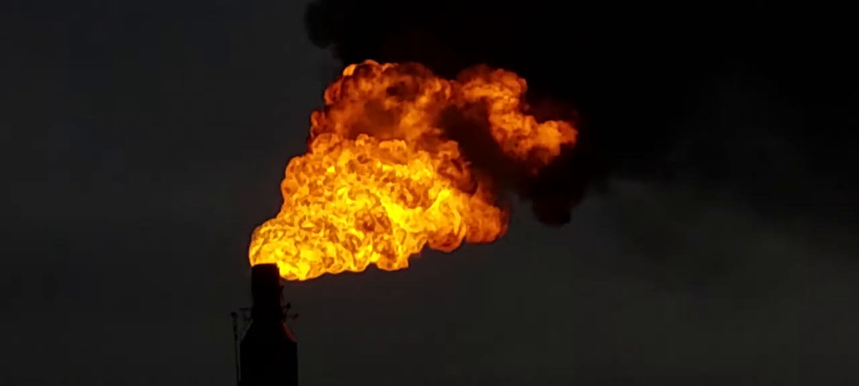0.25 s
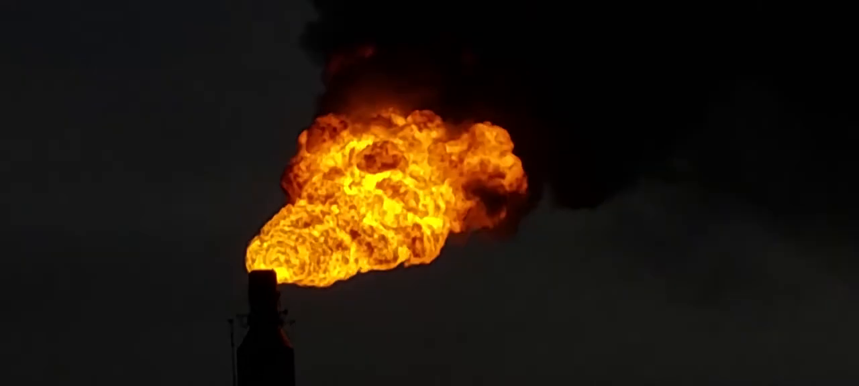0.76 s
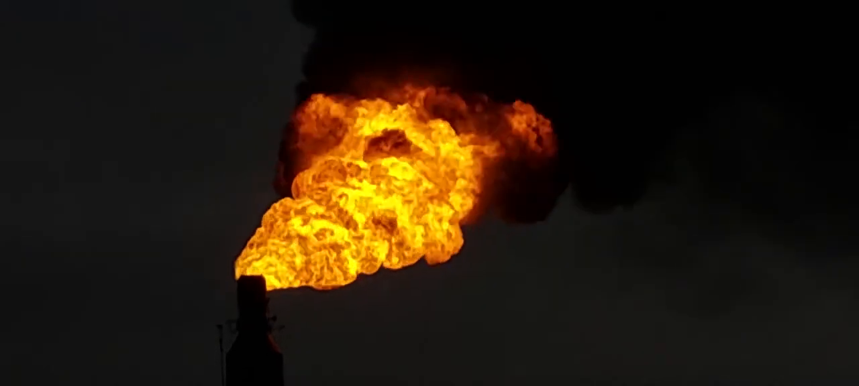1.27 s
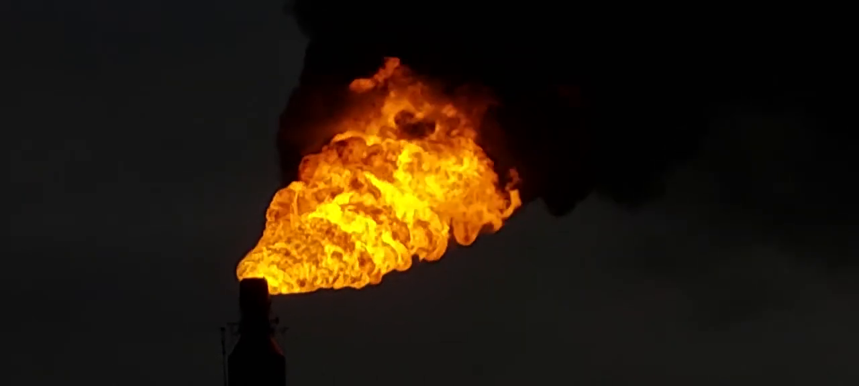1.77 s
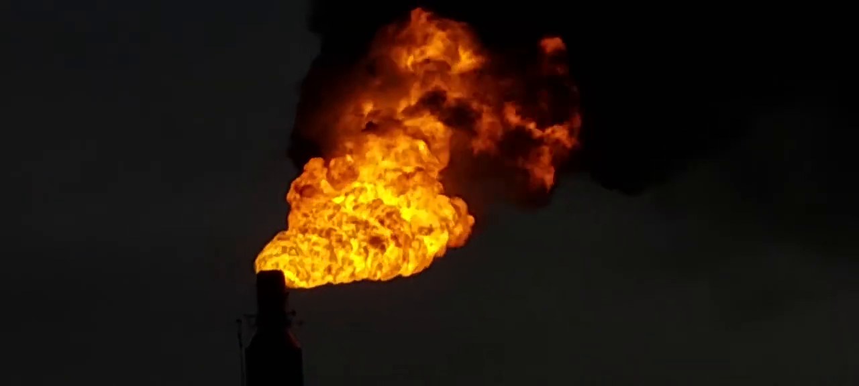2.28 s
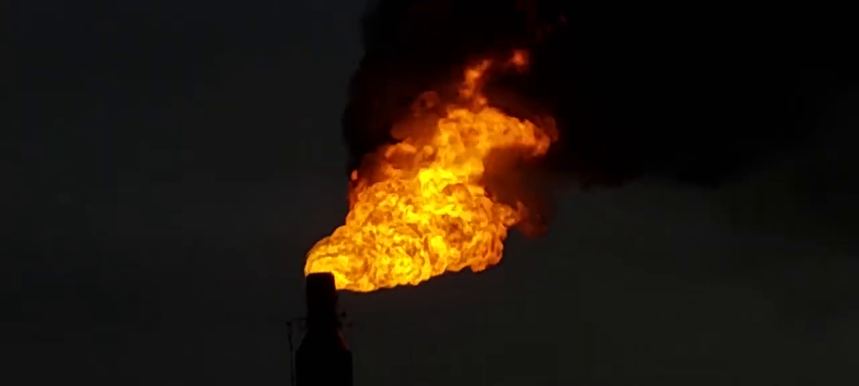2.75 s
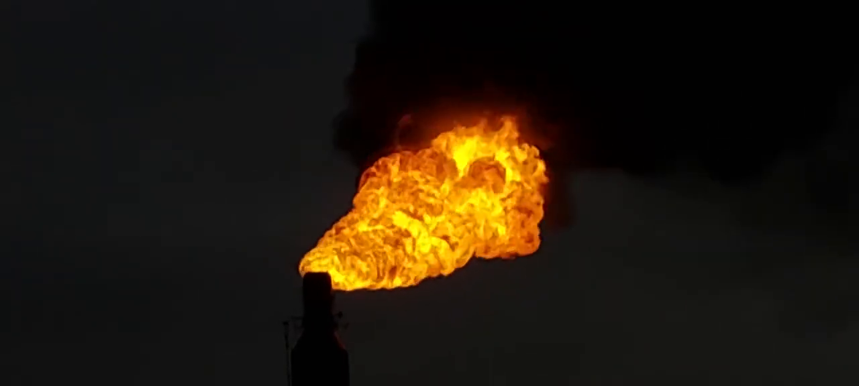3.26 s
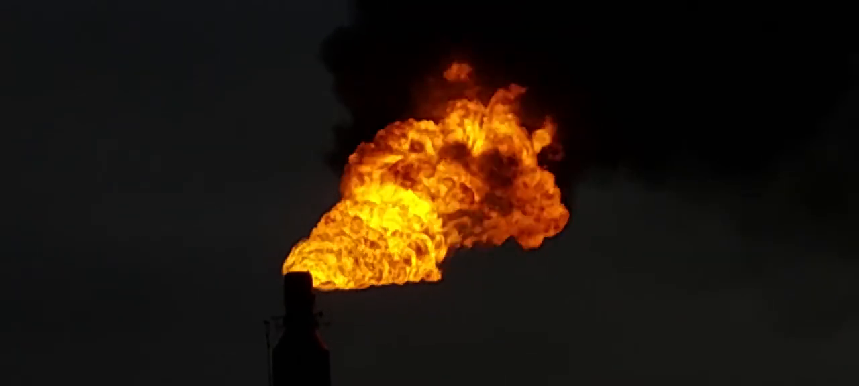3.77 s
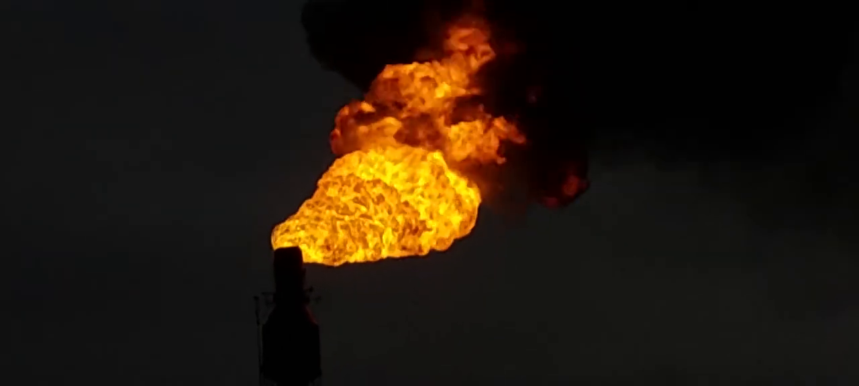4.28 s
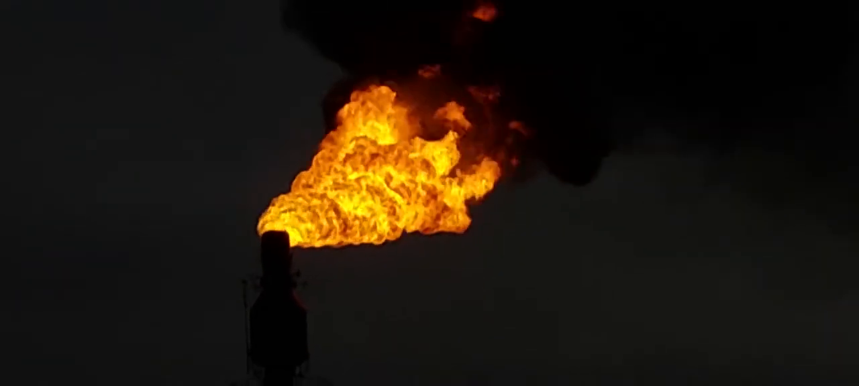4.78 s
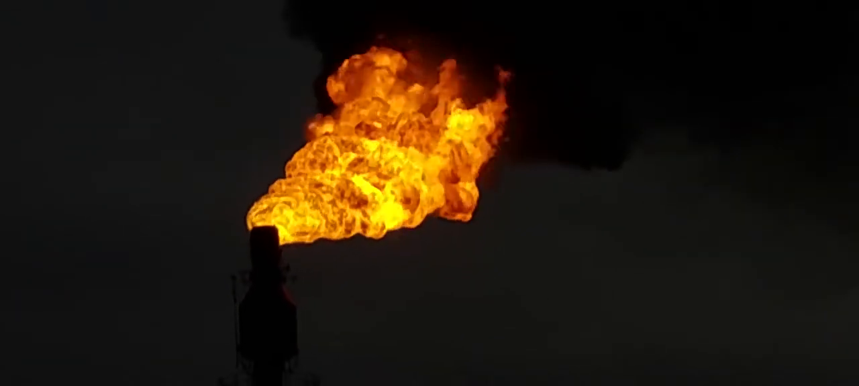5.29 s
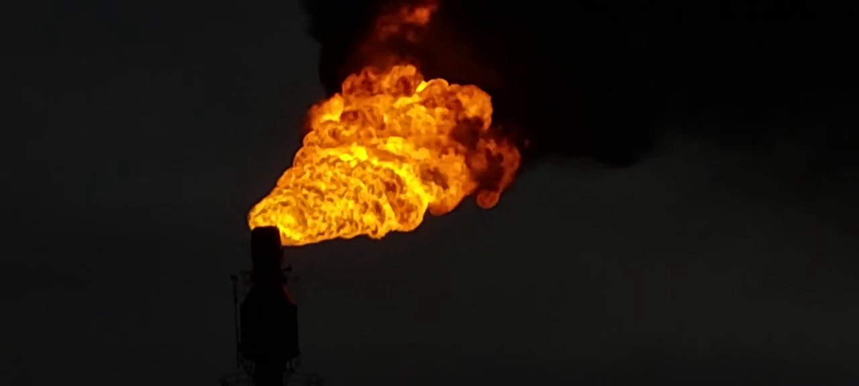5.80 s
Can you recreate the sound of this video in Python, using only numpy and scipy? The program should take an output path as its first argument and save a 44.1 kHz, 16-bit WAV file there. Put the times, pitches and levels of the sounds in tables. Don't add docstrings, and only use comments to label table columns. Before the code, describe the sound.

Steady industrial roar from start to finish: deep rumbling flame, a prominent low generator hum and throbbing hollow steel resonances. Above them lie a muted rush of gas and two faint high whistles, quivering as wind and heat carry them. No distinct events, just small random fluctuations. Open air at sea, captured by a handheld stereo recorder, dull in the extreme treble.

```python
import sys
import numpy as np
from scipy import signal
from scipy.fft import rfft, irfft
from scipy.io import wavfile
from scipy.ndimage import uniform_filter1d

SR = 44100
rng = np.random.default_rng(int(sys.argv[2]) if len(sys.argv) > 2 else 0)


def log_audio(samples):
    frames = np.atleast_2d(samples).T
    limited = np.clip(frames, -1, 1)
    pcm = np.round(limited * 32767).astype(np.int16)
    wavfile.write(sys.argv[1], SR, pcm)


def makeup_ratio(level_db):
    decades = np.asarray(level_db, float) / 20
    return 10 ** decades


N = 266364

# (frequency [Hz], density [dB per Hz])
FLAME_COLOUR = [(18, -80), (30, -73.5), (45, -57), (70, -51), (130, -55), (240, -53), (290, -55.5),
                (350, -58.5), (440, -61), (490, -66), (720, -66.5), (900, -72.5), (1200, -83), (2400, -160)]
# (frequency [Hz], likeness [0-1])
FLAME_ALIKE = [(30, 0.93), (100, 0.99), (150, 0.76), (260, 0.86), (400, 0.27), (520, 0.17), (700, 0)]
BILLOW_HZ, DEEP_BILLOW, UPPER_BILLOW = 1.5, 0.039, 0.09

# (frequency [Hz], density [dB per Hz])
HISS_COLOUR = [(600, -95), (900, -71.5), (1300, -72.5), (1600, -75), (2300, -75), (2900, -82), (3600, -82),
               (4500, -85.5), (5100, -86), (6200, -88.5), (8000, -90.5), (9000, -104), (11500, -103.5),
               (15700, -109)]
# (frequency [Hz], likeness [0-1])
HISS_ALIKENESS = [(800, .5), (1100, 0.5), (1600, 0.66), (2100, 0.78), (2800, 0.3), (3400, 0.24),
                  (4400, 0.35), (5000, 0.062), (5600, 0.71), (6200, .05)]
# (frequency [Hz], left lead [rad])
HISS_LEFT_LEAD = [(700, -3.5), (1100, -2.5), (1500, -1.77), (2000, 0), (2900, 2), (3700, 6.5), (4600, 9),
                  (5300, 11), (6100, 17.5)]

WHINE_PITCH_HZ = [2137.5, 5428.5]
# (time [s], peak level [dB], length [s])
LOW_WHINE_PATHS = [(0.02, -47, 0.04), (0.18, -40.5, 0.09), (0.34, -43, 0.14), (0.42, -40.7, 0.06),
                   (0.61, -43, 0.15), (0.94, -45.5, 0.54), (1.22, -43.5, 0.12), (1.42, -44.5, 0.13),
                   (1.62, -45.5, 0.33), (1.96, -42.5, 0.31), (2.16, -39.5, 0.14), (2.41, -49.5, 0.21),
                   (2.67, -43, 0.08), (2.83, -43.0, 0.08), (3.06, -50.4, 0.47), (3.33, -47, 0.08),
                   (3.56, -43.5, 0.09), (3.72, -43.4, 0.12), (3.87, -45.6, 0.18), (4.04, -49.5, 0.11),
                   (4.17, -44, 0.06), (4.3, -46.5, 0.13), (4.51, -41.2, 0.1), (4.83, -44, 0.47),
                   (5.03, -39.5, 0.12), (5.17, -49.7, 0.06), (5.37, -49.1, 0.09), (5.6, -42.5, 0.07),
                   (5.76, -44.5, 0.16), (5.94, -42.9, 0.15)]
# (time [s], peak level [dB], length [s])
HIGH_WHINE_PATHS = [(0.06, -53.6, 0.06), (0.16, -54.5, 0.07), (0.26, -51.5, 0.05), (0.46, -57, 0.15),
                    (0.53, -50, 0.15), (0.69, -54, 0.32), (0.97, -54.5, 0.13), (1.16, -58.4, 0.1),
                    (1.36, -60.6, 0.08), (1.48, -60.2, 0.05), (1.57, -51, 0.1), (1.67, -55, 0.08),
                    (1.83, -56, 0.12), (2.15, -56.0, 0.51), (2.63, -53, 0.077), (2.74, -61, 0.28),
                    (3.0, -62, 0.15), (3.19, -55.5, 0.11), (3.55, -54, 0.55), (3.89, -52, 0.1),
                    (4.1, -57.3, 0.37), (4.37, -54.5, 0.1), (4.46, -55.5, 0.09), (4.67, -58.4, 0.14),
                    (4.83, -56.5, 0.15), (5.03, -56.5, 0.4), (5.36, -55.4, 0.07), (5.53, -51.5, 0.16),
                    (5.7, -55.5, 0.09), (5.98, -60, 0.09)]
WHINE_LULLS = [-56, -66]

# (time [s], pitch [Hz], level [dB])
FIRING_TONE = [
    (0, 89.87, -19.7),
    (1.5, 89.91, -19.7),
    (3, 89.94, -19.7),
    (3.5, 89.99, -19.7),
    (4.5, 89.93, -19.7),
    (6.04, 89.91, -19.7),
]
# (multiple of firing tone [-], level [dB rms], left-right [dB], left lead [rad])
SHAFT_ORDERS = [(7 / 6, -45, -0.6, -.08), (1.5, -40.5, -5.5, 0.23), (2.0, -41.5, -1, -0.2),
                (5.0, -53, -3, -1.4)]

DECK_DRONE_HZ = [55.04, 74.6, 323.4]
# (time [s], peak level [dB], length [s])
LOW_DRONE_SWELLS = [(0.1, -38.5, 0.64), (0.76, -34, 0.48), (1.16, -35.9, 0.12), (1.36, -33.3, 0.28),
                    (1.93, -34.5, 0.57), (2.38, -36.5, 0.22), (2.67, -29.4, 0.25), (3.21, -31.1, 0.28),
                    (3.93, -32.2, 0.4), (4.19, -40.3, 0.12), (4.55, -37, 0.44), (4.7, -37, 0.14),
                    (5.26, -35, 0.7), (5.88, -39, 0.3)]
# (time [s], peak level [dB], length [s])
MID_DRONE_SWELLS = [(0.03, -36, 0.17), (0.56, -36, 0.55), (1.26, -32, 0.25), (1.79, -38, 0.11),
                    (2.02, -36, 0.22), (2.38, -29.5, 0.28), (2.8, -26.5, 0.18), (3.09, -37, 0.12),
                    (3.29, -40.7, 0.16), (4.57, -37, 0.36), (5.17, -42, 0.23), (5.7, -37, 0.16),
                    (5.89, -41, 0.13), (5.97, -39, 0.09)]
# (time [s], peak level [dB], length [s])
STEEL_SWELLS = [(0.52, -46, 0.82), (1.08, -35, 0.1), (1.3, -40.5, 0.07), (1.71, -47.5, 0.64),
                (2.33, -49, 0.079), (2.54, -41, 0.065), (2.95, -35, 0.073), (3.11, -37, 0.14),
                (3.39, -39, 0.07), (3.41, -47, 0.23), (3.81, -40, 0.12), (4.22, -38.7, 0.08),
                (4.35, -44.5, 0.51), (4.82, -42, 0.07), (5.18, -45, 0.22), (5.77, -40.5, 0.28)]
DRONE_LULLS = [-59, -44.5, -47.5]
# (frequency [Hz], level [dB rms], width
# [Hz], left-right [dB], left lead [rad])
PUMP_LINES = [(112.6, -45, .5, 0, 0), (136.3, -44, .6, 2.7, .3), (151.1, -43, .8, 5, .6),
              (202, -41, 2.5, -1.4, -.27), (230.7, -45, .8, -4, -.6), (247, -40, 9, -1, 0),
              (445, -50, 14, -3, .3), (541, -53, 14, -3, .8), (714, -51.5, 22, -3, -1.6),
              (932, -58, 12, 0, -2.1), (1094.6, -61, 2, 2.7, -2.4), (1204, -64, 2, 5, -2.1),
              (1238, -61, 4, 5, -2.0), (1350.6, -60, 3, 5, -1.7), (2120, -56, 90, 2, .6),
              (5425, -63, 95, 3, 0), (9648, -108, 8, 40, 0), (9950, -110, 10, 40, 0),
              (11457, -97.5, 9, 40, 0)]

# (frequency [Hz], gain [dB])
RIGHT_PORT_GAIN = [(40, 2), (100, .8), (300, 1.2), (500, 2.5), (750, 3), (950, 0), (1300, -3), (2500, -3),
                   (3100, -1), (5000, 1.5), (5600, -1.5), (6200, -9), (6700, -25), (6900, -70)]
# (frequency [Hz], density [dB per Hz])
RIGHT_SELF_NOISE = [(8100, -160), (8400, -126), (9200, -125), (11400, -118), (11800, -126), (14000, -130),
                    (16000, -134)]


def flame():
    roar = rush(FLAME_COLOUR, FLAME_ALIKE, [(1, 0.0076), (2, 0.0)], patchy_db=0.44, size=4096)
    deep = signal.sosfiltfilt(signal.butter(3, 220, fs=SR, output="sos"), roar)
    upper = roar - deep
    deep_breath = 1 + DEEP_BILLOW * flutter(BILLOW_HZ).real
    upper_breath = 1 + UPPER_BILLOW * flutter(BILLOW_HZ).real
    return deep * deep_breath + upper * upper_breath


def gas_hiss():
    return rush(HISS_COLOUR, HISS_ALIKENESS, HISS_LEFT_LEAD, patchy_db=3.0, size=1024)


def low_whine():
    db = fading(LOW_WHINE_PATHS, WHINE_LULLS[0])
    return makeup_ratio(1.0) * whine(WHINE_PITCH_HZ[0], db, blur=.17, blur_hz=20, sway_hz=6, apart=.4,
                            pan_db=2.1, lead=.62, octave_db=-16.5, octave_pan_db=2.5)


def high_whine():
    db = fading(HIGH_WHINE_PATHS, WHINE_LULLS[1])
    return makeup_ratio(-0.1) * whine(WHINE_PITCH_HZ[1], db, blur=.19, blur_hz=24, sway_hz=6.5, apart=.65,
                             pan_db=3.5, lead=-.13, octave_db=-40, octave_pan_db=40)


def generator():
    hz, db = played(FIRING_TONE)
    out = tone(hz, db, 1., pan_db=-0.75, lead=-.07)
    for multiple, order_db, pan_db, lead in SHAFT_ORDERS:
        unsteady = 1 + 0.3 * flutter(0.73)
        out = out + tone(multiple * hz, order_db, unsteady, pan_db, lead)
    return out


def deck():
    low_hz, mid_hz, steel_hz = DECK_DRONE_HZ
    low_db = swells(LOW_DRONE_SWELLS, DRONE_LULLS[0])
    mid_db = swells(MID_DRONE_SWELLS, DRONE_LULLS[1])
    steel_db = swells(STEEL_SWELLS, DRONE_LULLS[2])
    out = tone(low_hz, low_db, 1 + .15 * flutter(2.5), pan_db=-2.2, lead=.23)
    out += tone(mid_hz, mid_db - 0.3, 1 + 0.21 * flutter(3.0), pan_db=-2.0, lead=0.26)
    out += tone(steel_hz, steel_db - 0.5, 1 + 0.85 * flutter(18), pan_db=-2.0, lead=-.2)
    for hz, db, width_hz, pan_db, lead in PUMP_LINES:
        out += tone(hz, db, flutter(width_hz), pan_db, lead)
    return out


def whine(hz, db, blur, blur_hz, sway_hz, apart, pan_db, lead, octave_db, octave_pan_db):
    shared = (1 - blur) + blur * flutter(blur_hz)
    shape = evened(shared) + apart * flutter(blur_hz) * [[1], [-1]]
    octave_shape = np.array([flutter(blur_hz), flutter(blur_hz)])
    sway = sway_hz * flutter(blur_hz / 2).real
    core = tone(hz + sway, db, shape, pan_db, lead)
    return core + tone(2 * hz, db.mean() + octave_db, octave_shape, octave_pan_db)


def fading(rows, lull_db):
    t = np.arange(0, N + 64, 64) / SR
    s, db, length = np.transpose(rows)[:, :, None]
    sign = (-1.) ** np.arange(len(rows))[:, None]
    arrivals = sign * makeup_ratio(db) * .5 ** (abs(2 * (t - s) / length) ** 3)
    level = np.hypot(makeup_ratio(lull_db), arrivals.sum(axis=0))
    return np.interp(np.arange(N) / SR, t, 20 * np.log10(level))


def swells(rows, lull_db):
    t = np.arange(0, N + 64, 64) / SR
    s, db, length = np.transpose(rows)[:, :, None]
    bells = makeup_ratio(db) * .5 ** ((2 * (t - s) / length) ** 2)
    level = makeup_ratio(lull_db) + bells.sum(axis=0)
    return np.interp(np.arange(N) / SR, t, 20 * np.log10(level))


def rush(colour, alike, lead, patchy_db, size):
    overlap = size * 3 // 4
    noise = rng.standard_normal((3, N + size))
    hz, _, (a, b, patches) = signal.stft(noise, SR, nperseg=size, noverlap=overlap)
    patches = uniform_filter1d(patches.real, size=12, axis=0)
    patches = evened(uniform_filter1d(patches, size=8, axis=1))
    same = np.clip(read(alike, hz), 0, 1)[:, None]
    right = same * a + np.sqrt(1 - same ** 2) * b
    right = right * np.exp(-1j * read(lead, hz))[:, None]
    right = right * makeup_ratio(read(RIGHT_PORT_GAIN, hz))[:, None]
    density = makeup_ratio(read(colour, hz)[:, None] + patchy_db * patches) * np.sqrt(SR / 2)
    ports = density * np.array([a, right])
    return signal.istft(ports, SR, nperseg=size, noverlap=overlap)[1][:, :N]


def tone(hz, db, shape, pan_db=0., lead=0.):
    turn = np.exp(2j * np.pi * (np.cumsum(hz * np.ones(N)) / SR + rng.random()))
    halves = np.array([[.5], [-.5]])
    place = makeup_ratio(halves * pan_db) * np.exp(1j * halves * lead)
    return np.sqrt(2) * makeup_ratio(db) * (place * shape * turn).real


def flutter(width_hz):
    count, stride = 2 ** 14, 16
    slow_hz = np.fft.fftfreq(count, stride / SR)
    skirt = np.exp(-(slow_hz / 300) ** 2) / (1j * slow_hz + np.clip(width_hz, .1, 99) / 2)
    z = np.fft.ifft(skirt * (rng.standard_normal((count, 2)) @ [1, 1j]))
    return evened(np.interp(np.arange(N) / stride, np.arange(count), z, period=count))


def evened(x):
    return x / np.sqrt(np.mean(abs(x) ** 2) + 1e-30)


def read(points, hz):
    f, value = np.transpose(points)
    return np.interp(np.log(hz + 1), np.log(f + 1), value)


def played(rows):
    s, *columns = np.transpose(rows)
    return [np.interp(np.arange(N) / SR, s, c) for c in columns]


def scene():
    return flame() + gas_hiss() + low_whine() + high_whine() + generator() + deck()


def band_limit(x):
    return signal.sosfilt(signal.butter(12, 15750, fs=SR, output="sos"), x)


def record(dry):
    hz = np.fft.rfftfreq(N, 1 / SR)
    density = makeup_ratio(read(RIGHT_SELF_NOISE, hz)) * np.sqrt(SR / 2)
    self_noise = irfft(rfft(rng.standard_normal(N)) * density, N)
    opening_s = .006
    opening = np.minimum(np.arange(N) / SR / opening_s, 1)
    mix = opening * (dry + self_noise * [[0], [1]])
    return band_limit(mix)


dry = scene()
out = record(dry)
log_audio(out)
```